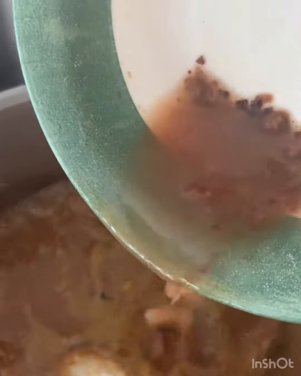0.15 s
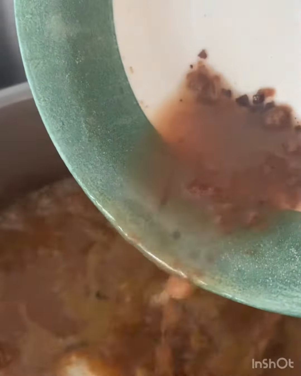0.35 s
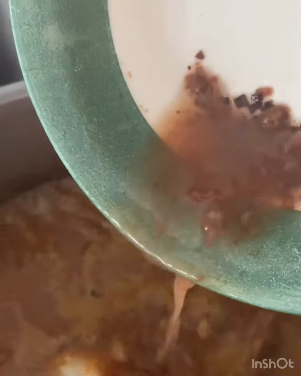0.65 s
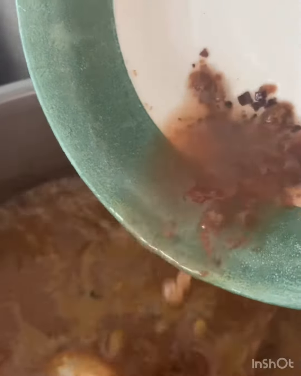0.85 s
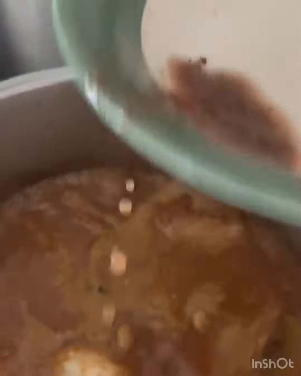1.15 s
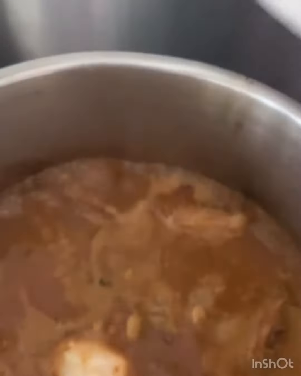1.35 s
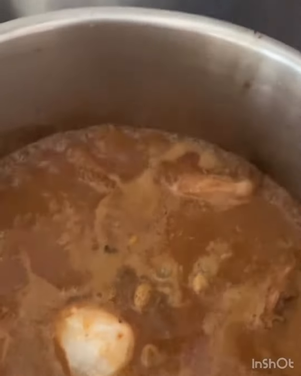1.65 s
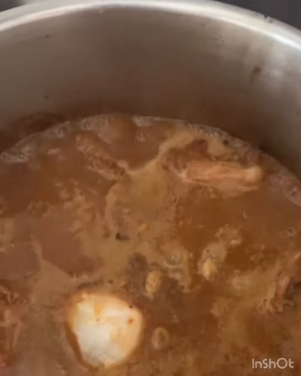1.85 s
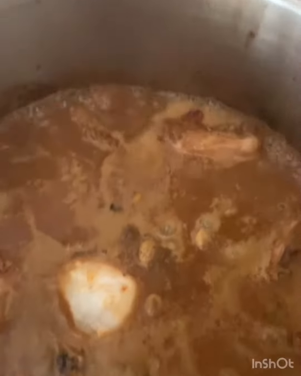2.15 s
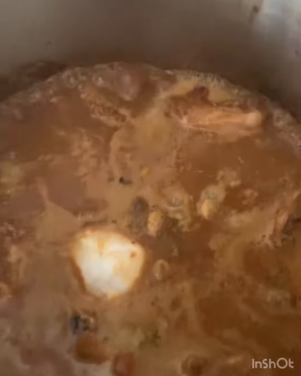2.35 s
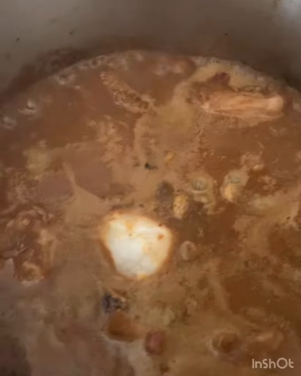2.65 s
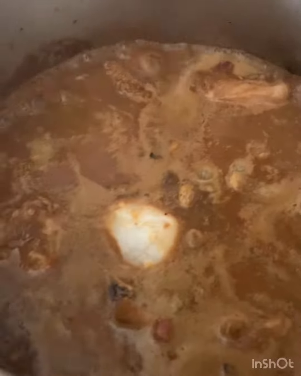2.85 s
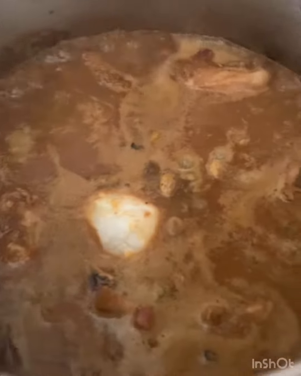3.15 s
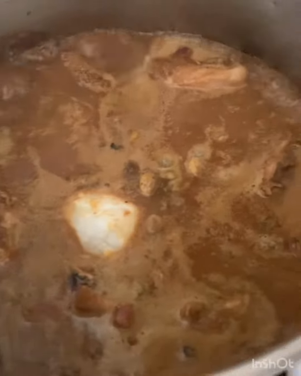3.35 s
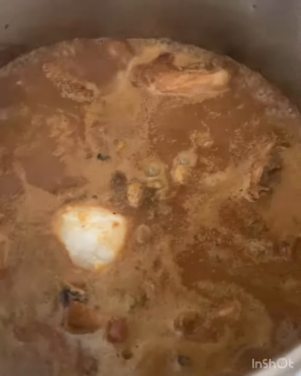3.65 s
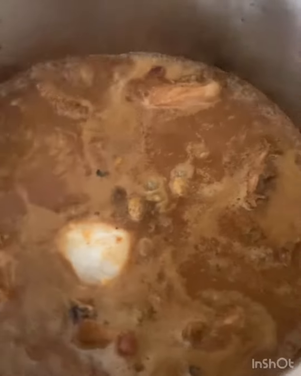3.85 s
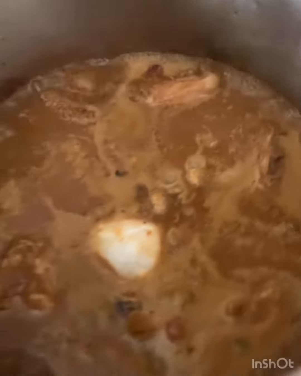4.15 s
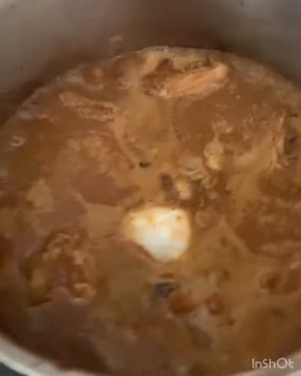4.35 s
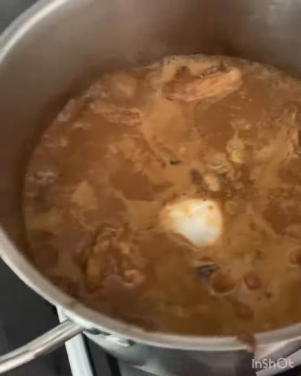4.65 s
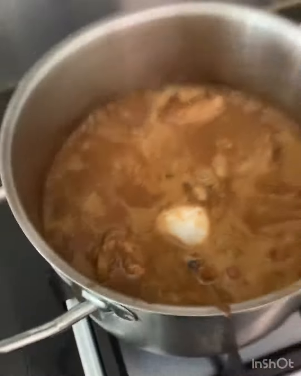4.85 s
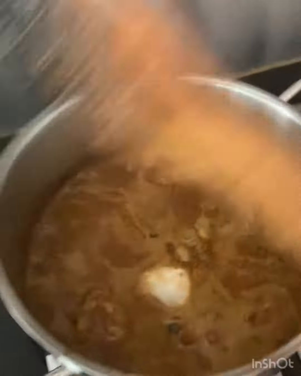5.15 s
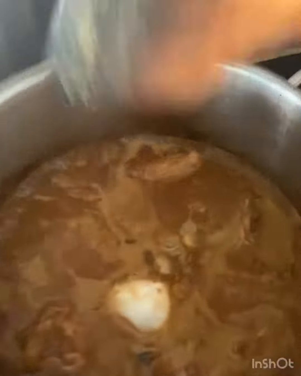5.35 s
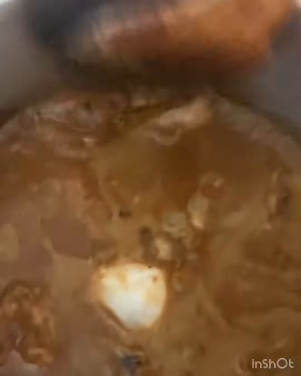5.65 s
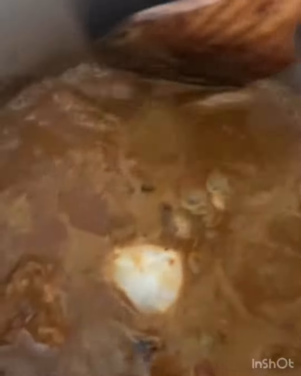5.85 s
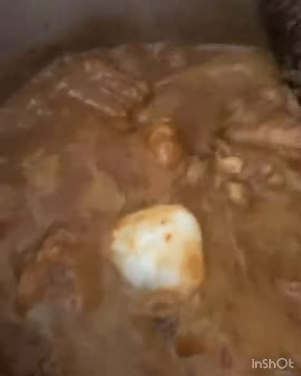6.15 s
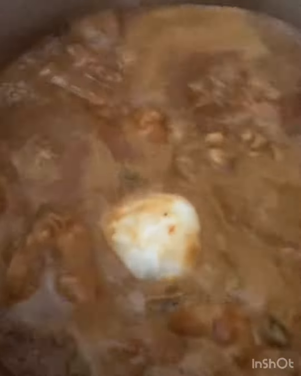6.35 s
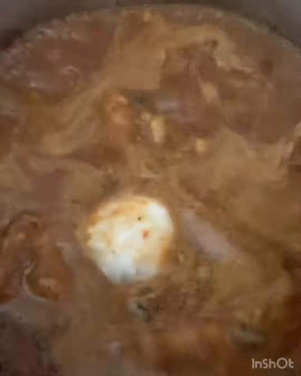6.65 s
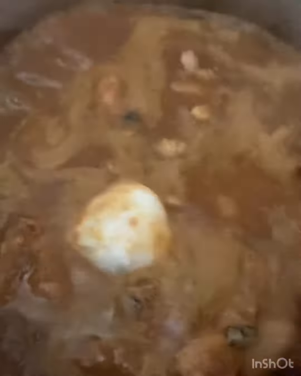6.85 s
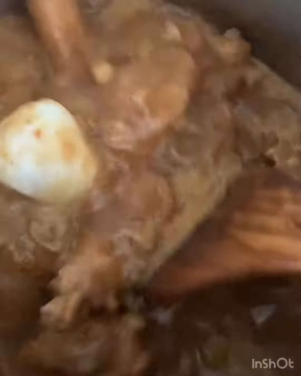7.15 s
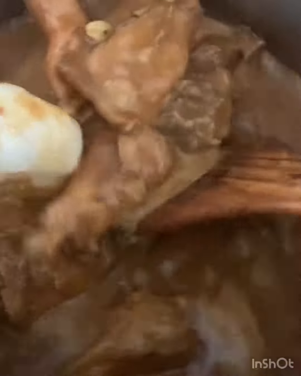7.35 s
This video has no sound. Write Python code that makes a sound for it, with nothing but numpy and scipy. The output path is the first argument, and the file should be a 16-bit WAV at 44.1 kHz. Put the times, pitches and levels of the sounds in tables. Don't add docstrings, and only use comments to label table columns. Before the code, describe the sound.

A phone held near the pot picks up low fan hum, a breathy burner and fine sizzle. A brief rattle of a bowl opens it, with a distant engine dropping away. The simmer quietens, broken by one double thud and faint bumps. The air turns more open for a moment, then close again as a wooden spoon clanks, drags and splashes, loudest near the end.

```python
import sys
import numpy as np
from scipy import signal
from scipy.fft import rfft, irfft, next_fast_len
from scipy.io import wavfile
from scipy.ndimage import map_coordinates

SR = 44100
rng = np.random.default_rng(int(sys.argv[2]) if len(sys.argv) > 2 else 0)


def wav_record(signal):
    frames = np.transpose(np.atleast_2d(signal))
    bounded = np.clip(frames, -1, 1)
    quanta = np.round(bounded * 32767).astype(np.int16)
    wavfile.write(sys.argv[1], SR, quanta)


def ratio(d):
    e = np.asarray(d, float) / 20
    return 10 ** e


N = 330750

# (frequency [Hz], level [dB/Hz])
RUMBLE = [(13, -46), (22, -61), (38, -1.5), (64, -9), (86, 1), (103, -3), (119, -6), (134, -6.5),
          (147, -10.5), (157, -12), (201, -8), (218, -19), (260, -26.5), (340, -54), (570, -120)]
AIR = [(180, -18.5), (260, -6), (420, -8), (700, -7), (1000, -20.5), (1300, -9), (1700, -13), (2500, -18.5),
       (4000, -22), (6000, -37.5)]
FLAME = [(550, -23), (720, -9), (800, 16), (900, 15.5), (1080, 11.5), (1200, -7), (1500, -31)]
STEAM = [(700, -66), (1300, -9), (1900, -9.5), (2900, -3.5), (4000, -5.5), (5600, -3), (8000, -4),
         (10300, -2.5), (12000, 0), (14000, -8), (15800, -6), (16200, -41)]
# (frequency [Hz], width [Hz], level over the air [dB])
CLOSE_HUMPS = [(211.4, 40, 18), (383, 5.5, 5), (516.5, 15, 6.5), (612.6, 88, 14), (746, 7.7, 11),
               (1085, 85, 14.5), (1322.5, 17, 11.5)]
BACK_HUMPS = [(216.7, 20, 22), (367, 9, 8.5), (529, 99, 20.5), (610, 100, -20.5), (779, 17, 20.5),
              (1136, 35, 17.5), (1355, 27, 3)]
# (time [s], share away [0-1])
AWAY = [
    (0, 0.16),
    (4.2, 0.19),
    (4.75, 0.63),
    (5.3, 0.61),
    (5.65, 0.08),
    (7.5, 0.02),
]
# (time [s], level [dB])
BURNER = [(0, -39), (.4, -45.5), (1.45, -41), (1.75, -50), (3.4, -51), (4.7, -49), (5.4, -49), (6, -52),
          (7.5, -47.5)]
# (time [s], pitch [Hz], level [dB])
ENGINE = [
    (0, 103, -35.5),
    (.17, 97.7, -32),
    (.45, 84.4, -34.5),
    (.75, 79.6, -39),
    (1.1, 75.3, -55),
]
# (time [s], level [dB])
SIMMER = [(0, -48), (1.5, -48), (2.5, -56.5), (3.2, -55.5), (3.6, -51), (4.9, -58), (5.08, -62.5),
          (5.6, -53.5), (7.5, -67)]
# (time [s], peak [dB], rise [dB/s], fade [dB/s])
SPILLS = [(.03, -44, 448, 205), (.17, -39.5, 490, 300), (.36, -40, 82, 10.5), (.89, -45, 300, 89),
          (1.14, -46.5, 203, 5), (2.11, -53, 200, 64), (2.71, -58, 100, 39), (3.24, -54.5, 500, 40),
          (3.38, -50.5, 700, 111.5), (4.01, -61, 100, 150), (4.12, -54.5, 80, 10.5), (4.41, -55, 400, 63),
          (4.59, -55, 120, 40), (4.9, -51.5, 150, 150), (4.96, -56, 150, 200), (5.29, -58, 400, 300),
          (5.688, -30, 313.3, 96), (5.79, -43.5, 100, 21), (6.014, -48, 500, 55), (6.115, -59, 500, 45),
            (6.147, -32, 256, 104), (6.272, -33, 500, 51.3), (6.37, -37, 60, 410), (6.424, -38, 700, 1000),
            (6.49, -36, 153, 44), (6.904, -37, 73, 33), (7.03, -49, 302, 60), (7.129, -27.5, 1520, 40),
            (7.15, -21, 700, 30.3), (7.2, -27, 94, 70), (7.27, -27.5, 61.3, 61), (7.33, -52, 50.5, 90),
            (7.45, -46, 200, 40)]
# (time [s],
# peak [dB], pitch [Hz])
SPITS = [(0.0227, -13, 7120), (0.0757, -23, 6460), (0.164, -23, 3680), (1.715, -31, 8120),
         (2.144, -30, 9350), (2.7074, -35, 6800), (2.82, -33.5, 7240), (3.38, -24, 13300),
         (3.466, -33, 13250), (3.551, -33, 13900), (3.6033, -33, 14000), (3.611, -30, 15000),
         (3.629, -30, 13200), (3.746, -31, 13800), (3.8415, -29, 7700), (3.856, -27, 7200),
         (3.9963, -31, 9000), (3.997, -25, 3970), (4.113, -38, 6740), (4.488, -33.5, 7410),
         (4.5183, -40, 3570), (4.645, -35, 4590), (5.053, -34, 3930), (5.2557, -34, 4120),
         (4.8823, -34, 7100), (4.9394, -33.5, 8140), (4.962, -30, 8660), (5.2848, -30.5, 7440),
         (5.3387, -36, 7450), (5.589, -28, 8400),
         (5.6396, -28, 6510), (5.651, -32, 9500), (5.665, -25, 6520), (5.683, -15, 6660),
         (5.8524, -23, 6970), (5.873, -28, 8680), (5.902, -25, 9150), (6.013, -29, 8700),
         (6.113, -26, 8300), (6.2661, -21, 9900), (6.3378, -16, 8800), (6.3724, -15, 7000),
         (6.42, -18.5, 7500), (6.548, -24, 10100), (6.141, -29, 8300), (6.7371, -35, 7700),
         (6.8236, -31, 8510), (6.849, -21, 8250), (6.9216, -18, 8500), (7.029, -24.5, 9000),
         (7.135, -19, 9300), (7.1294, -26, 7660), (7.157, -7.5, 8400), (7.119, -42, 13500),
         (7.423, -42, 8730), (7.437, -13.5, 8400), (6.8959, -23, 9740), (6.6886, -28, 8260),
         (7.4722, -10, 8500), (7.4925, -14, 8460)]
# (time [s], peak [dB], rise [dB/s], fade [dB/s])
STROKES = [(.16, -30, 500, 79), (.27, -36, 40, 220), (6.14, -36, 67, 60), (6.295, -36.5, 101, 78),
           (6.35, -28, 72, 130), (6.74, -50, 55, 30), (6.95, -35, 37.5, 47), (7.126, -27.5, 1200, 29),
           (7.2, -21.5, 150, 82), (7.32, -43, 63, 42.5)]
# (frequency [Hz], width [Hz], level [dB])
WALL = [(740, 220, -4.5), (1420, 190, -0.5), (2025, 270, 2), (2880, 240, 1.5), (4360, 1100, -25)]
# (frequency [Hz], level [dB], t60 [s])
BOWL = [(563, -0.5, 0.072), (790, -4, 0.11), (957, 6.5, 0.048), (1235, -2, 0.098), (1607, 3, 0.16),
        (1710, 8.5, 0.066), (1910, 5.5, 0.064), (2580, -9, .04), (4050, -14.5, 0.017)]
COUNTER = [(139, -4.5, 0.16), (200, 6.5, 0.056), (309, 9.5, 0.03), (550, 2, 0.06), (1276, -5.5, 0.11),
           (1930, 2, 0.022)]
POT_FLOOR = [(213, 8.5, 0.068), (367, -5, 0.06), (683, 9, 0.021), (770, -3, 0.055), (1090, 0.5, 0.013),
             (1594, -8.5, 0.038), (3620, -11, .02)]
RIM = [(209.4, -12, 0.25), (377, -15.5, 0.28), (588, 9, 0.019), (682, -14.5, 0.24), (1136, -14.5, 0.14),
       (1545, 2.5, 0.023), (2140, -13.5, 0.036), (3000, -2, 0.022), (6550, -9, 0.023)]
SIDE_WALL = [(210, -6, .1), (371, -1, .11), (620, 4, .035), (800, -1, .045), (1125, -12, .02),
             (1650, 0, .016), (2000, 4, .02), (2350, 0, .035), (3000, -10, .016), (4000, -13, .016)]
# (time [s], peak [dB], hardness [dB/octave], contact [s], rattle [dB])
BOWL_BLOWS = [
    (0.1687, -6, 0.5, 0.0018, -5.5),
    (.1772, -8, -3, 0.0008, -14),
    (0.1852, -11, -7.5, 0.0017, -9.5),
    (0.1912, -7.5, -1, 0.001, -8),
    (.203, -18, 10, .002, -5),
]
COUNTER_BLOWS = [
    (3.7895, -13, 5, 0.0025, -12),
    (3.7964, -2.5, 1.5, 0.00062, -14.5),
    (3.803, -2.5, -6.5, 0.00078, -18),
    (3.8387, -20, -3, .002, -8),
    (3.85, -29, 0, 0.0046, 5),
    (3.873, -37, 7, .004, 8),
]
SOFT_BLOWS = [
    (4.584, -25, 2.3, 0.0051, 3),
    (4.619, -35, 3, 0.0025, -4),
    (4.662, -24, 2, .002, -23),
    (6.6905, -19, 9, .0006, -14),
    (6.693, -9, -1, 0.0015, -16.5),
    (6.7347, -15.5, 2, 0.0005, -25),
]
RIM_BLOWS = [
    (5.6845, -0.36, 0.55, 0.00079, -17.5),
]
WALL_BLOWS = [
    (6.288, -19, 3, 0.0013, -7),
    (6.3735, 1, 1, 0.00064, -13.5),
    (6.418, -20, -2, .001, -16),
    (6.4235, -6.5, 2.5, 0.00085, -14.5),
    (6.484, -15.5, -0.5, 0.0015, -13),
]
# (frequency [Hz], t60 [s])
KITCHEN = [(150, 0.19), (1000, 0.38), (4000, 0.068), (12000, 0.13)]
# (frequency [Hz], lead [rad])
LEAD = [(0, 0), (800, -.7), (1900, 1.1), (2400, 2.2), (2800, 3), (3300, 2.9), (4000, 1.3), (4900, 2.8),
        (5600, 3.5), (7600, 6), (9000, 6.6), (11000, 9), (12300, 9.75), (13800, 12.4), (17000, 12.8)]
# (frequency [Hz], likeness [-1 to 1])
ALIKE = [(130, 0.85), (290, 1), (600, 0.87), (1400, 0.54), (3000, 0.61), (4200, .6), (5300, 0.78),
         (8000, 0.75), (13000, 0.91)]
FAR_ALIKE = [(60, 0.99), (130, 1), (290, 0.85), (640, -0.062), (1400, -0.26), (3000, -0.13)]
# (frequency [Hz], left minus right [dB])
TILT = [(60, -0.5), (200, -2), (380, 2.5), (600, -2.5), (1300, -0.5), (2400, 0), (6000, 0)]


def unit(x):
    return x / np.sqrt(np.mean(x ** 2) + 1e-20)


def along(points, hz):
    f, v = np.transpose(points)
    return np.interp(np.log(hz + 1), np.log(f + 1), v)


def curves(rows):
    s, *cols = np.transpose(rows)
    return [np.interp(np.arange(N) / SR, s, c) for c in cols]


def swells(rows):
    t = np.arange(0, N, 32) / SR
    power = 0
    for s, db, rise, fade in rows:
        drop_db = np.where(t < s, rise * (s - t), fade * (t - s))
        power = power + ratio(db - drop_db) ** 2
    return np.sqrt(power).repeat(32)[:N]


def wobble(rate):
    knots = rng.standard_normal(int(N * rate / SR) + 4)
    return map_coordinates(knots, [np.arange(N) * rate / SR])


def filtered(x, response):
    m = next_fast_len(N + SR // 2)
    return irfft(rfft(x, m) * response(np.fft.rfftfreq(m, 1 / SR)), m)[..., :N]


def humps(peaks, hz):
    return sum(height / (1 + (2 * (hz - c) / w) ** 2) for c, w, height in peaks)


def crackle(spread_db, swell):
    sizes = np.minimum(rng.exponential(size=N // 16 + 1), 5)
    starts = ratio(spread_db * sizes).repeat(16)[:N]
    size = signal.lfilter([1], [1, -.96], starts ** 2) ** .5
    return unit(swell * size * rng.standard_normal((2, N)))


def fan():
    rumble_db, tone_db, air_db = -36, -32, -36.5
    rumble = unit(filtered(rng.standard_normal((2, N)), lambda hz: ratio(along(RUMBLE, hz))))
    pitch = 132 + 1.75 * wobble(13)
    tone_sway = ratio(0.38 * wobble(18) + 0.7 * wobble(4.9))
    tone = np.sin(2 * np.pi * np.cumsum(pitch) / SR) * tone_sway
    flow = rng.standard_normal((2, N))
    close, back = [unit(filtered(flow, lambda hz: ratio(along(AIR, hz) + humps(resonances, hz))))
                   for resonances in (CLOSE_HUMPS, BACK_HUMPS)]
    away = np.clip(curves(AWAY)[0], 0, 1)
    air = ratio(air_db + 1.13 * wobble(6.026)) * ((1 - away) * close + away * back)
    return ratio(rumble_db) * rumble + ratio(tone_db) * tone + air


def burner():
    colour = lambda hz: ratio(along(FLAME, hz)) * (hz > 500) * (hz < 1600)
    flame = unit(filtered(rng.standard_normal((2, N)), colour))
    return ratio(curves(BURNER)[0] + 1.5 * wobble(7.5)) * flame


def engine():
    pitch, level_db = curves(ENGINE)
    turn = 2 * np.pi * np.cumsum(pitch + 1.5 * wobble(12.7)) / SR
    t = np.arange(N) / SR
    overtone_db = 3 - 52 * t
    lines = np.sin(turn) + ratio(overtone_db) * np.sin(2 * turn)
    return ratio(level_db + 0.58 * wobble(11)) * (t < ENGINE[-1][0]) * lines * [[1], [0]]


def boiling():
    return np.hypot(ratio(curves(SIMMER)[0]), swells(SPILLS))


def sizzle():
    bursts = crackle(spread_db=2.2, swell=ratio(1.0 * wobble(14) + .8 * wobble(70)))
    steam = unit(filtered(bursts, lambda hz: ratio(along(STEAM, hz)) * (hz > 600)))
    return ratio(5.5) * boiling() * steam


def bubbles():
    per_second, low_hz, pitch_range, cycles, rise = 40, 650, 6, 28, .12
    low_db, tilt_db, spread_db = -43, -3, 2
    out = np.zeros((2, N + SR // 10))
    for when, pitch, size in rng.random((int(per_second * N / SR), 3)):
        hz = low_hz * pitch_range ** pitch
        u = np.arange(0, 1, hz / cycles / SR)
        db = low_db + tilt_db * np.log2(hz / low_hz) - spread_db * np.log(size + 0.038)
        swell = np.sin(np.pi * u ** .5) ** 2
        note = np.sin(2 * np.pi * cycles * u * (1 + rise * u))
        out[0, int(when * N):][:len(u)] += ratio(db) * swell * note
    return out[:, :N]


def strays():
    per_second, over_db, spread_db, top_db = 30, 9, 2.5, -27
    u = rng.random((400, 3))[:int(per_second * N / SR)]
    s = u[:, 0] * (N - 1) / SR
    boil_db = 20 * np.log10(boiling()[(s * SR).astype(int)])
    db = boil_db + over_db - spread_db * np.log(u[:, 1] + .05)
    return list(zip(s, np.minimum(db, top_db), 3500 * 4 ** u[:, 2]))


def spits():
    out, t = np.zeros((2, N + 1500)), np.arange(1500) / SR
    for s, db, hz in SPITS + strays():
        ring = np.sin(2 * np.pi * hz * t) * ratio(-60 * t / 0.0032)
        ring = ring + 0.28 * np.cos(3.2 * np.pi * hz * t) * ratio(-60 * t / 0.00084)
        fizz = 0.43 * ratio(-60 * t / 0.0066) + 0.136 * ratio(-60 * t / 0.057)
        spray = rng.standard_normal((2, 1500)) * fizz
        out[:, round(s * SR):][:, :1500] += ratio(db + 5.5) * (spray + ring * [[1], [.4]])
    return filtered(out[:, :N], lambda hz: hz ** 2 / (hz ** 2 + 2500 ** 2))


def scrape():
    grains = crackle(spread_db=4.0, swell=ratio(2.6 * wobble(30)))
    wall = lambda hz: humps([(c, w, ratio(db)) for c, w, db in WALL], hz)
    return ratio(-5.0) * swells(STROKES) * unit(filtered(grains, wall))


def echo(x):
    hz, t, z = signal.stft(rng.standard_normal((2, SR // 3)), SR, nperseg=256)
    decay = ratio(-60 * t / along(KITCHEN, hz)[:, None])
    tail = signal.istft(z * decay, SR, nperseg=256)[1]
    late = np.pad(x, (420, 0))[None]
    return signal.fftconvolve(late, tail / np.linalg.norm(tail[0]), axes=1)[:, :len(x)]


def knocks(modes, blows, echo_db):
    out, t = np.zeros((2, N + SR)), np.arange(SR // 3) / SR
    hz = np.fft.rfftfreq(len(t), 1 / SR)
    outline = [(60, -84)] + [(c, level) for c, level, _ in modes] + [(1.9 * modes[-1][0], -45)]
    for s, db, hard_db, contact, rattle_db in blows:
        ring = 0
        for c, level, t60 in modes:
            mode_db = level + hard_db * np.log2(c / 800) - 60 * t / t60
            ring = ring + ratio(mode_db) * np.sin(2 * np.pi * c * t)
        colour = ratio(along(outline, hz) + hard_db * np.log2(hz / 800 + 0.23))
        rattle = unit(irfft(rfft(rng.standard_normal(len(t))) * colour)) * ratio(-60 * t / 0.065)
        ring = ring / np.max(abs(ring)) + ratio(rattle_db) * rattle
        ring = ring * (1 - np.exp(-t / abs(contact)))
        scattered = .5 * np.pad(ring, (70, 0))[:len(t)]
        out[:, round(s * SR):][:, :len(t)] += ratio(db) * ([ring, scattered] + ratio(echo_db) * echo(ring))
    return out[:, :N]


def bowl():
    return knocks(BOWL, BOWL_BLOWS, echo_db=-6.5)


def counter():
    return -knocks(COUNTER, COUNTER_BLOWS, echo_db=-9.5)


def pot_floor():
    return knocks(POT_FLOOR, SOFT_BLOWS, echo_db=-8.5)


def rim():
    return knocks(RIM, RIM_BLOWS, echo_db=-15.5)


def side_wall():
    return knocks(SIDE_WALL, WALL_BLOWS, echo_db=-16)


def ports(pair, alike, lead):
    turn = lambda hz: np.arccos(np.clip(alike(hz), -1, 1)) / 2
    direct, scattered = filtered(pair, lambda hz: np.array([np.cos(turn(hz)), np.sin(turn(hz))]))
    both = np.array([direct + scattered, direct - scattered])
    return filtered(both, lambda hz: np.exp(.5j * np.outer([1, -1], lead(hz))))


def scene():
    near = sizzle() + bubbles() + spits() + scrape() + pot_floor() + rim()
    far = fan() + burner() + engine() + bowl() + counter() + side_wall()
    lead = lambda hz: np.interp(hz, *np.transpose(LEAD))
    near = ports(near, lambda hz: along(ALIKE, hz), lead)
    return near + ports(far, lambda hz: along(FAR_ALIKE, hz), lambda hz: 0 * hz)


def roll_off(x):
    return signal.sosfilt(signal.butter(12, 16960, fs=SR, output="sos"), x)


def record(dry):
    mix = filtered(dry, lambda hz: ratio(np.outer([.5, -.5], along(TILT, hz))) * (hz < 16700))
    return roll_off(mix)


dry = scene()
out = record(dry)
wav_record(out)
```